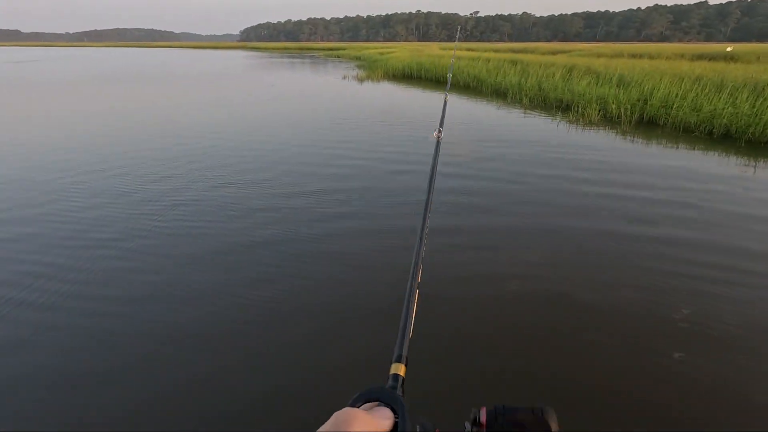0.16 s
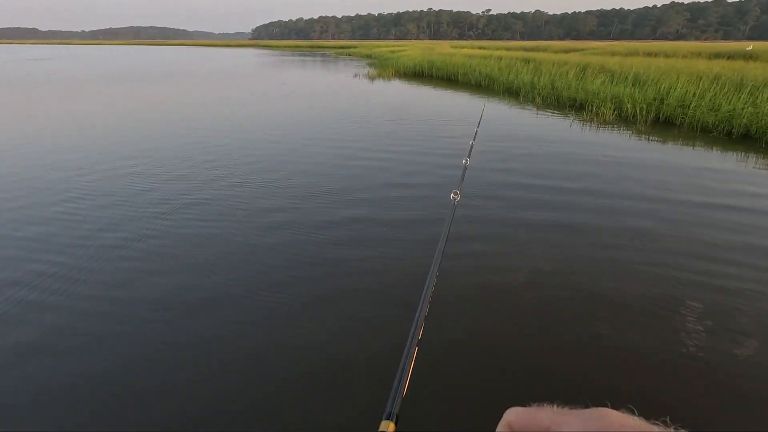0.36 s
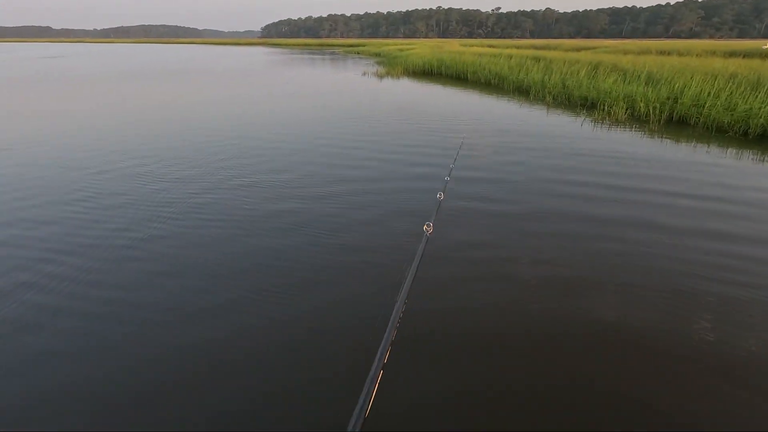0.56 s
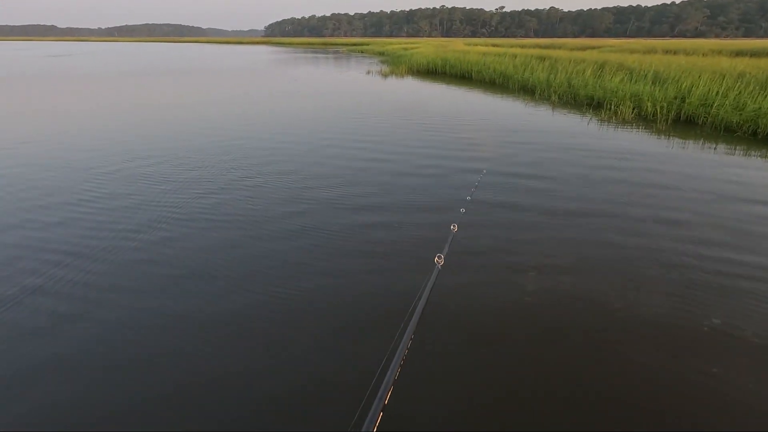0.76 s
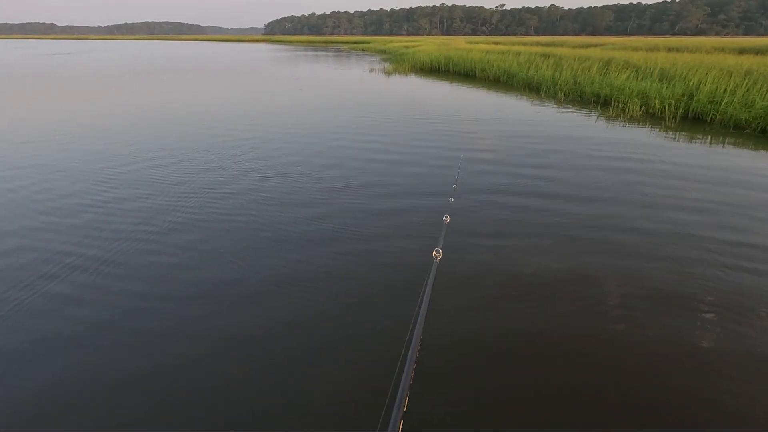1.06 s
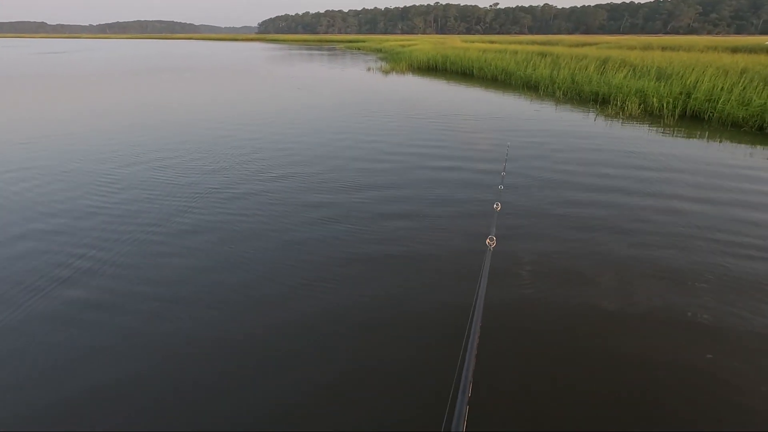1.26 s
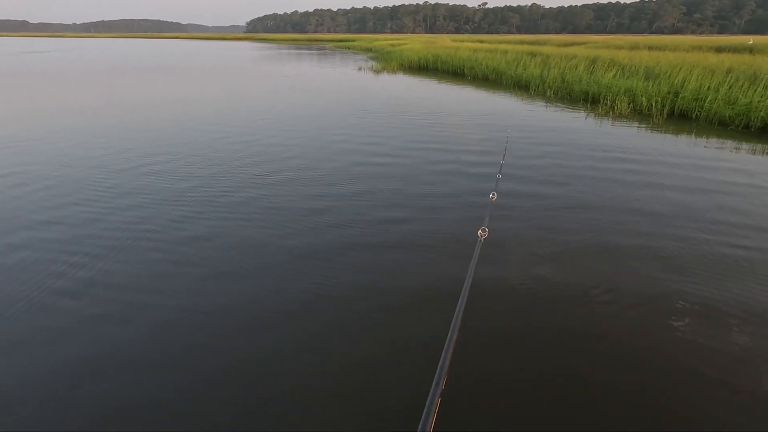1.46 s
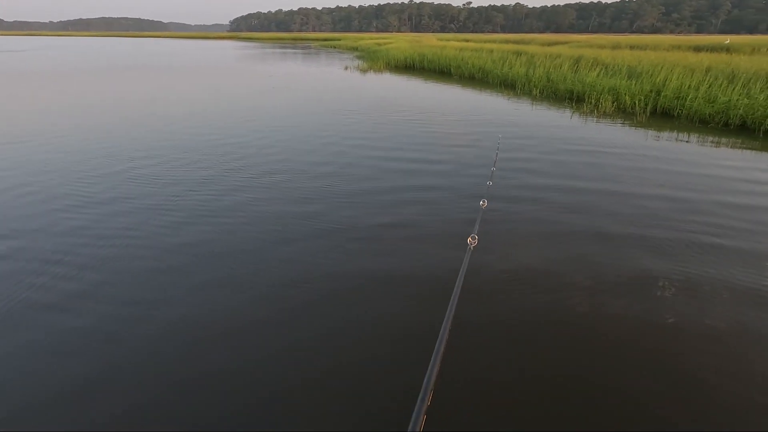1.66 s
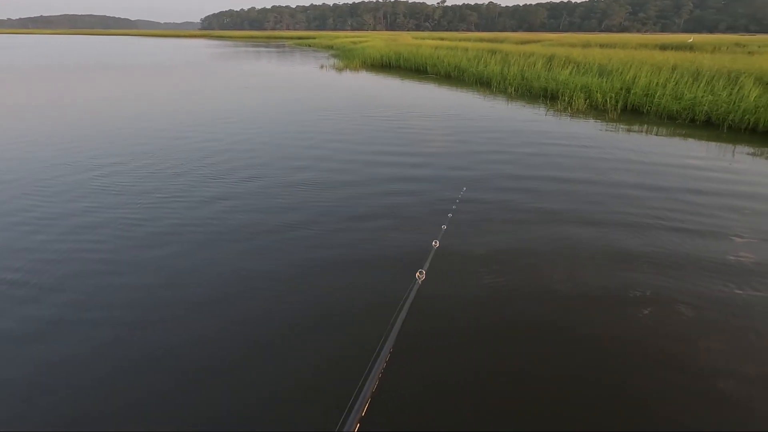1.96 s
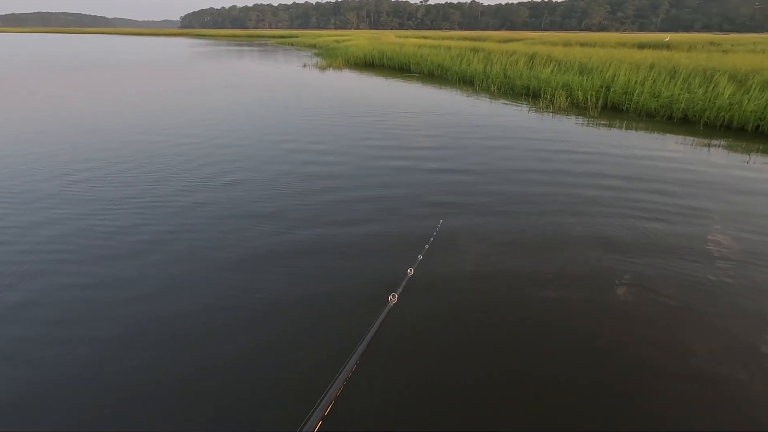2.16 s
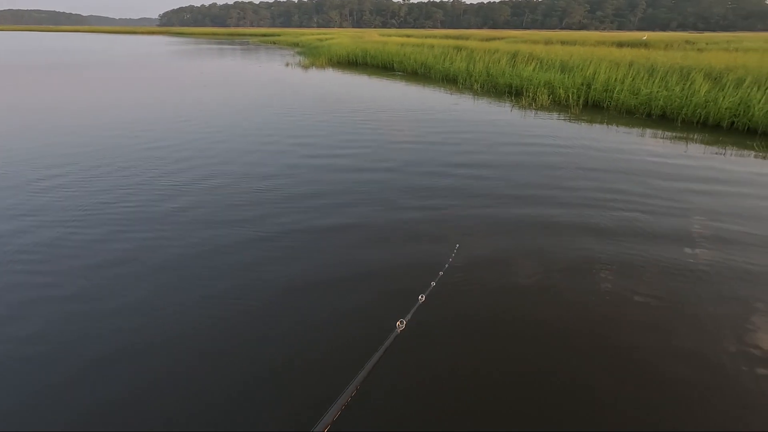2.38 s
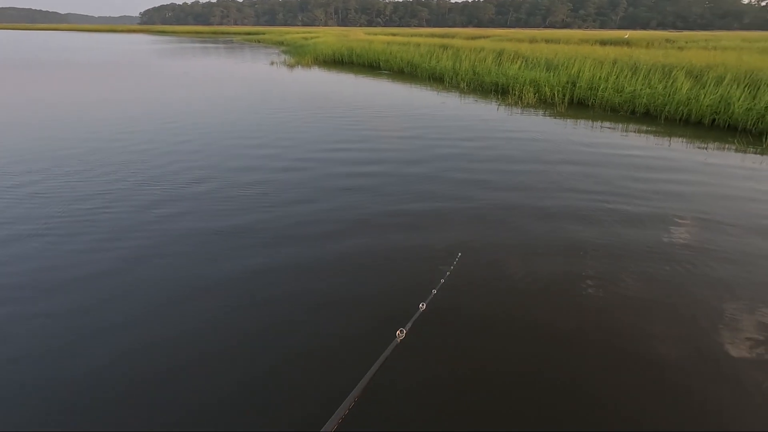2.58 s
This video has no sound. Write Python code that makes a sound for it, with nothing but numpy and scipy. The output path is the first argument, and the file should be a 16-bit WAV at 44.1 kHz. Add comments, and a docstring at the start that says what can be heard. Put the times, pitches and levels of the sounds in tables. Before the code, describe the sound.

A fishing reel latch snaps shut very close to the microphone, loud and dry, soon after the start; then soft gear ticks and whirr, grip rubbing and dull hull knocks over low wind rumble and faint birds.

```python
"""A small boat on a calm marsh, taken by a nearly mono action camera right beside a fishing reel.
From the start light air rumbles on the microphone over a faint open-air hiss and a far motor's hum.
Small birds whistle falling notes throughout; a gear tick comes just before the reel's latch snaps shut.
Then the gears tick and whirr softly, thin squeaks come and go, something rubs the grip and the hull knocks.
Noise is shaped for wind, hiss, whirr and rubbing; struck modes make the reel; sines the rest."""
import sys
import numpy as np
from scipy import signal
from scipy.fft import rfft, irfft
from scipy.io import wavfile
from scipy.ndimage import uniform_filter1d

SR = 44100
rng = np.random.default_rng(int(sys.argv[2]) if len(sys.argv) > 2 else 0)


def unload_audio(sound):
    """Save the sound as a 16-bit wav file, at the path given as the first command line argument."""
    columns = np.transpose(np.atleast_2d(sound))
    # keep every value between -1 and 1, then stretch to whole-number steps
    steps = np.round(np.clip(columns, -1, 1) * 32767)
    wavfile.write(sys.argv[1], SR, steps.astype(np.int16))


N = 121275
T = np.arange(N) / SR


def undb(db):
    """Amplitude factor for a level in dB."""
    return 10 ** (np.asarray(db) / 20)


def unit(x):
    """Scale to an RMS of 1."""
    return x / np.sqrt(np.mean(x ** 2))


def curve(rows, order=1):
    """Gain along a dB column over time, fading over 50 ms outside the table."""
    r = np.array(rows, float)
    edge = np.clip(np.minimum(T - r[0, 0], r[-1, 0] - T) / .05 + 1, 0, 1)
    return undb(np.interp(T, r[:, 0], r[:, order])) * edge


def coloured(points, lo_hz=1, hi_hz=SR):
    """Noise with a spectrum of (f/Hz, level/dB) points, rolled off beyond two edges."""
    p = np.array(points, float)
    f = np.arange(N // 2 + 1) * SR / N + 1e-3
    gain = undb(np.interp(np.log(f), np.log(p[:, 0]), p[:, 1]))
    gain = gain / np.sqrt((1 + (lo_hz / f) ** 8) * (1 + (f / hi_hz) ** 8))
    return irfft(rfft(rng.standard_normal(N)) * gain, N)


def walk(rate):
    """Random levels held for 1 / rate seconds and slewed; spread near 1."""
    k = int(SR / rate)
    held = np.repeat(rng.standard_normal(N // k + 1), k)
    return 1.4 * uniform_filter1d(uniform_filter1d(held, k), k)[:N]


def wind():
    """Air buffeting the microphone: low noise in two bands, each with its own gusts."""
    # relative noise spectrum: f/Hz, density/dB
    spectrum = [(4, -3), (14, 2), (30, -8), (50, -17.5), (90, -22.5), (150, -33), (400, -46)]
    # gusts: t/s, level/dB below 40 Hz, level/dB above 40 Hz
    gusts = [(0, -35.5, -56.5), (.15, -46, -54), (.27, -33, -54.5), (.45, -40, -51.5), (.65, -34.5, -49.5),
             (.78, -37, -53.5), (1.0, -48.5, -57.5), (1.27, -35.5, -54.5), (1.45, -36.5, -54),
             (1.62, -39.5, -55), (1.82, -40, -58.5), (1.97, -32.5, -55), (2.08, -30.5, -46.5),
             (2.25, -37, -54), (2.42, -34.5, -55), (2.75, -43.5, -54.5)]
    buffet = unit(coloured(spectrum, hi_hz=39.87)) * curve(gusts)
    rumble = unit(coloured(spectrum, lo_hz=40, hi_hz=300)) * curve(gusts, order=2)
    return buffet + rumble


def air():
    """Smooth distant hiss: noise in four bands, each flickering slightly by itself."""
    # relative noise spectrum: f/Hz, density/dB
    spectrum = [(120, -4), (250, -9.5), (500, -12), (1200, -21.5), (2500, -24), (5000, -29), (9000, -34.5),
                (16000, -39.5)]
    level_db, flicker_db = -65, 1.16
    edges = [120, 500, 2000, 6000, 20000]  # Hz
    bands = [coloured(spectrum, lo, hi) * undb(flicker_db * walk(7)) for lo, hi in zip(edges, edges[1:])]
    return undb(level_db) * unit(sum(bands))


def motor():
    """Three orders of a far engine, sharing a wavering speed, each wavering in level."""
    # engine orders: f/Hz (mean), level/dB (mean RMS)
    orders = [(127, -76.5), (190.5, -73), (254, -76.5)]
    turn = np.cumsum(1 + .006 * walk(3)) / SR  # running time of an unsteady engine
    return sum(np.sqrt(2) * undb(db + 3 * walk(4)) * np.sin(2 * np.pi * hz * turn) for hz, db in orders)


def whistle(s, length, hz, db, over_db):
    """A sine and its octave, wavering in pitch and level, soft-ended and fading as it goes."""
    waver_db, edge_s, fade_db = 4, 0.026, -4.5
    fade = fade_db * np.clip((T - s) / length, 0, 1) ** 2
    ends = np.clip(np.minimum(T - s, s + length - T) / edge_s, 0, 1)
    shape = ends * undb(db + fade + waver_db * walk(70))
    phase = 2 * np.pi * np.cumsum(hz * (1 + 0.0016 * walk(120))) / SR
    return np.sqrt(2) * shape * (np.sin(phase) + undb(over_db) * np.sin(2 * phase))


def birds():
    """Small birds: each whistled note falls quickly, then levels off."""
    # notes: t/s, length/s, start f/Hz, f/Hz approached, glide time constant/s, level/dB before fade
    notes = [(.075, 0.093, 5450, 5210, .02, -72), (.435, 0.053, 3470, 3200, 0.0194, -74),
             (.53, 0.15, 5700, 4660, .07, -68.5), (0.699, 0.058, 4350, 4050, .04, -76),
             (.82, .14, 4150, 3777, .07, -76.5), (1.44, .1, 3500, 2894, .03, -79.5),
             (1.715, .13, 4306, 3300, .17, -78.5), (1.83, 0.09, 3690, 3550, 0.025, -75),
             (2.169, .17, 6060, 4770, .036, -70), (2.305, 0.19, 4500, 4060, 0.058, -79.5),
             (2.655, .055, 5150, 4640, 0.04, -76)]
    overtone_db = -18.5
    out = np.zeros(N)
    for s, length, top, end, glide, db in notes:
        hz = end + (top - end) * np.exp(-np.clip(T - s, 0, None) / glide)
        out += whistle(s, length, hz, db, overtone_db)
    return out


def ring(x, hz, t60):
    """One exponentially fading mode, driven by x."""
    p = np.exp(2j * np.pi * hz / SR - np.log(1000) / (t60 * SR))
    return signal.lfilter([1], [1, -p], x).imag


def add(out, s, x):
    """Lay x into out from s seconds on."""
    i = int(s * SR)
    out[i:i + len(x)] += x[:N - i]


def strike(modes, ms):
    """A short scrape rings modes of chance strength; the loudest millisecond has RMS 0.5."""
    crack_db, spread_db = -5, 1.9
    n = np.arange(4096)
    push = rng.standard_normal(4096) * np.exp(-n / (ms * SR / 1000))
    push_size = np.sqrt(np.sum(push ** 2))
    gains = undb(spread_db * rng.standard_normal(len(modes))) * (-1) ** np.arange(len(modes))
    x = undb(crack_db) * uniform_filter1d(push, size=3) / push_size  # the bare contact
    for g, (hz, db, t60) in zip(gains, modes):
        # even out how strongly this scrape happens to drive the mode
        reach = np.abs(np.sum(push * np.exp(-2j * np.pi * hz * n / SR))) + push_size / 2
        x = x + g * undb(db) * ring(push, hz, t60) / reach
    x = signal.sosfilt(signal.butter(2, 400, "high", fs=SR, output="sos"), x)
    return x / np.sqrt(np.max(uniform_filter1d(x ** 2, size=44))) / 2


def gear_ticks():
    """Gear teeth close by: short contacts ring the small modes of the gear."""
    # gear modes: f/Hz, relative level/dB, t60/s
    modes = [(930, -5.5, 0.012), (1450, -4.5, 0.019), (1850, 1.5, .014), (2250, -1, 0.0091),
             (2970, -7.5, 0.0073), (3726, -6, 0.0079), (4580, -2.5, 0.0042), (6824, -16, 0.0053)]
    # ticks: t/s, strike gain/dB
    ticks = [(0.119, -51.5), (0.548, -46.5), (0.565, -39.5), (0.626, -37), (0.718, -44), (0.783, -42),
             (0.788, -46), (0.907, -45), (0.962, -41.5), (0.966, -40.5), (1.523, -41.5), (2.051, -52.5),
             (2.111, -40), (2.117, -42), (2.124, -54.5), (.6235, -42.5)]
    out = np.zeros(N)
    for s, db in ticks:
        add(out, s, undb(db) * strike(modes, ms=0.81))
    return out


def latch():
    """Latch contacts and rebounds ring the reel body, then the grass bank, rod and hull answer."""
    # reel body modes: f/Hz, relative level/dB, t60/s
    body = [(520, -21.5, 0.032), (858, -8, .025), (1430, -14, .02), (1820, -10, .015), (2290, -11, .012),
            (3008, -12, .01), (3700, -10, 0.0092), (4407, -1, 0.0053), (5750, -6.5, .007), (6900, -3, .007),
            (8200, -9.5, 0.0033), (9400, -1, .007), (10780, -12, 0.0031), (13600, -31.5, .005)]
    # contacts: t/s, strike gain/dB
    contacts = [(0.2515, -44), (0.2642, -21), (.266, -7), (.2666, 0.5), (0.2671, -8), (.2688, -17),
                (.2706, -19.5), (0.2742, -32), (.2935, -47.5)]
    # afterring in rod and hull: f/Hz, width w/Hz (noise filter t60 = 0.9 / w), level/dB, fade t60/s
    after = [(600, 500, -52.5, .6), (1600, 1500, -50.5, 0.6), (6000, 8000, -54, .1)]
    bank_s, bank_spread_s, bank_db = .08, .016, -45  # echo delay, spread and level
    out = np.zeros(N)
    for s, db in contacts:
        add(out, s, undb(db) * strike(body, ms=0.46))
    # scattered echo from the grass bank
    scatter = rng.standard_normal(SR // 5) * np.exp(-((T[:SR // 5] - bank_s) / bank_spread_s) ** 2)
    scatter = scatter / np.sqrt(np.sum(scatter ** 2))
    out = out + undb(bank_db) * signal.fftconvolve(out, scatter)[:N]
    since = np.clip(T - contacts[4][0], 0, None)  # s after the fifth contact
    for hz, width, db, t60 in after:
        fade = undb(db - 60 * since / t60) * (since > 0)
        out += fade * unit(ring(rng.standard_normal(N), hz, 0.9 / width))
    return out


def resonant(rows):
    """Noise ringing in several resonances, each flickering by itself."""
    grain_db = 3.5
    out = np.zeros(N)
    for hz, width, db in rows:
        out += undb(db + grain_db * walk(40)) * unit(ring(rng.standard_normal(N), hz, 3.7 / width))
    return unit(out)


def whirr():
    """Soft whirr of the turning reel: resonant noise following the turns."""
    # resonances: f/Hz, width w/Hz (t60 = 3.7 / w), relative level/dB
    resonances = [(1850, 670, 0.5), (1330, 400, -4.5), (2700, 780, -9.5), (4500, 3000, -10)]
    # turning: t/s, level/dB
    turning = [(.3, -72.5), (.45, -68), (.65, -67.5), (.86, -69), (.95, -70), (1.08, -68.5), (1.25, -72),
               (1.4, -70), (1.47, -64.5), (1.57, -67), (1.66, -76), (1.8, -78)]
    return resonant(resonances) * curve(turning)


def squeaks():
    """Thin metallic squeaks: steady high whistles without overtone."""
    # squeaks: t/s, length/s, f/Hz, level/dB before fade
    rows = [(.57, 0.059, 12260, -85.5), (.775, .11, 12300, -86.5), (1.435, 0.056, 12490, -73.5),
            (1.44, 0.031, 14600, -66)]
    return sum(whistle(s, length, hz, db, -np.inf) for s, length, hz, db in rows)


def rubbing():
    """Soft rubbing on the grip: resonant noise swelling with the pressure."""
    # resonances: f/Hz, width w/Hz (t60 = 3.7 / w), relative level/dB
    resonances = [(520, 180, 0), (752, 200, -4)]
    # pressure: t/s, level/dB
    pressure = [(.84, -75.5), (.93, -62), (1.0, -63), (1.12, -55), (1.19, -62), (1.24, -72.5),
                (1.32, -63.5), (1.4, -72)]
    return resonant(resonances) * curve(pressure)


def hull():
    """Soft single-mode knocks of the hull; low ones ring longer."""
    # knocks: t/s, starting level/dB, f/Hz
    knocks = [(1.305, -52.5, 800), (1.322, -39.5, 182), (1.327, -33.5, 92), (1.71, -51.5, 650),
              (1.812, -48.5, 330), (1.814, -52.5, 520)]
    out, n = np.zeros(N), np.arange(SR // 3) / SR
    for s, db, hz in knocks:
        t60 = 0.039 + 9.9 / hz  # s: a fixed part and 9.9 cycles
        attack = np.minimum(n * hz, 1)  # one cycle
        add(out, s, undb(db - 60 * n / t60) * np.sin(2 * np.pi * hz * n) * attack)
    return out


def scene():
    """Sum all sources in the middle and add a faint stereo side between 4.2 and 12.7 kHz."""
    near = gear_ticks() + latch() + whirr() + rubbing()
    mid = wind() + air() + motor() + birds() + near + squeaks() + hull()
    # independent hiss and a quiet, lagged copy of the close sounds, levels before the band-pass
    hiss_db, close_db, lag = -88, -29, 7  # lag in samples
    apart = undb(hiss_db) * rng.standard_normal(N) + undb(close_db) * np.roll(near, lag)
    side = signal.sosfilt(signal.butter(4, (4200, 12700), "band", fs=SR, output="sos"), apart)
    return np.array([mid + side, mid - side])


def record(dry):
    """Limit peaks to 0.88, then low-pass at 15.8 kHz."""
    limited = np.clip(dry, -.88, .88)
    return signal.sosfilt(signal.ellip(10, .2, 70, 15800, fs=SR, output="sos"), limited)


dry = scene()
out = record(dry)
unload_audio(out)
```